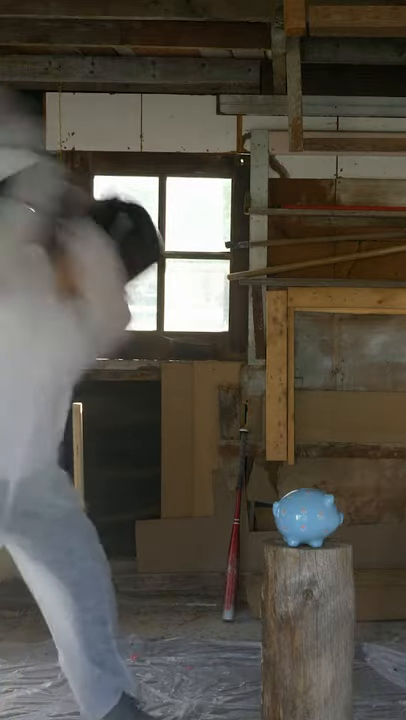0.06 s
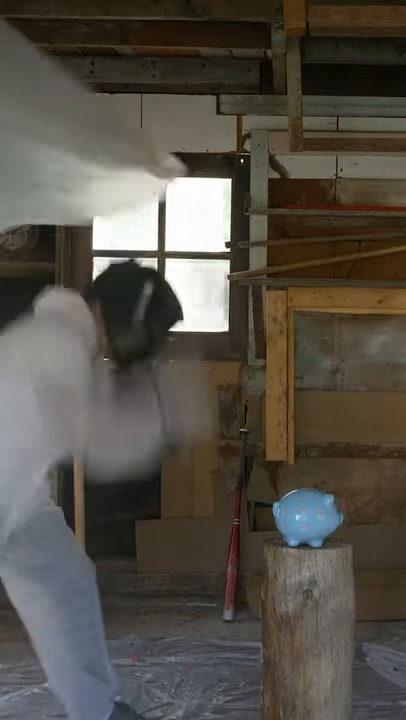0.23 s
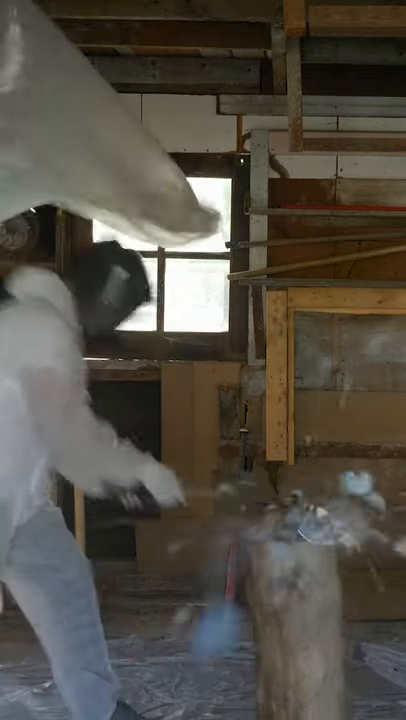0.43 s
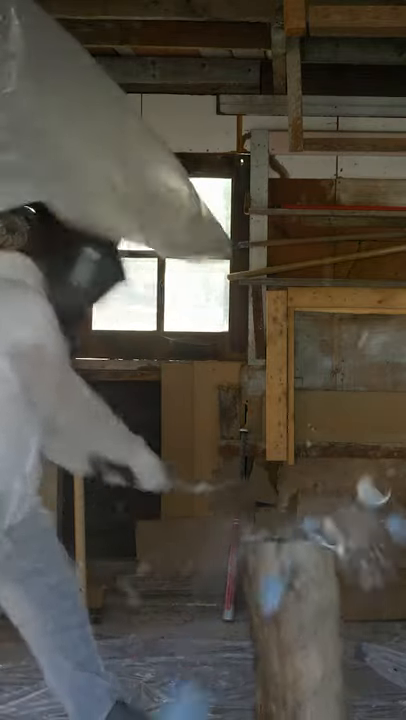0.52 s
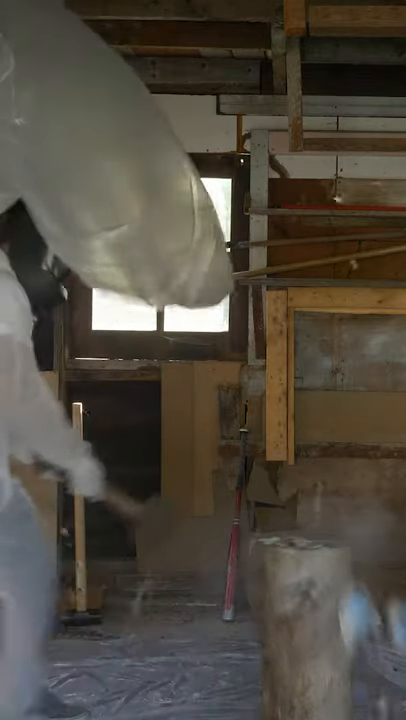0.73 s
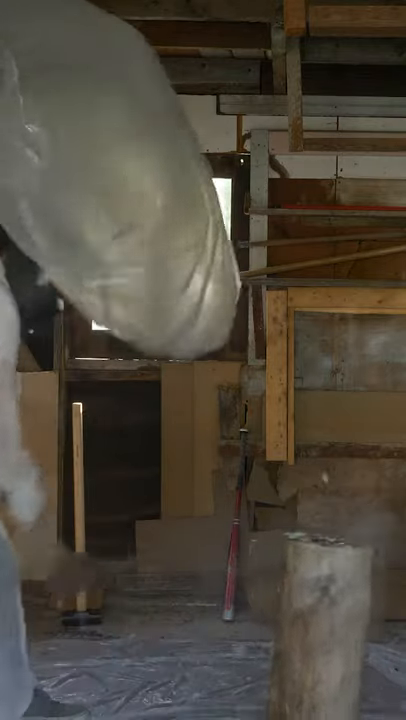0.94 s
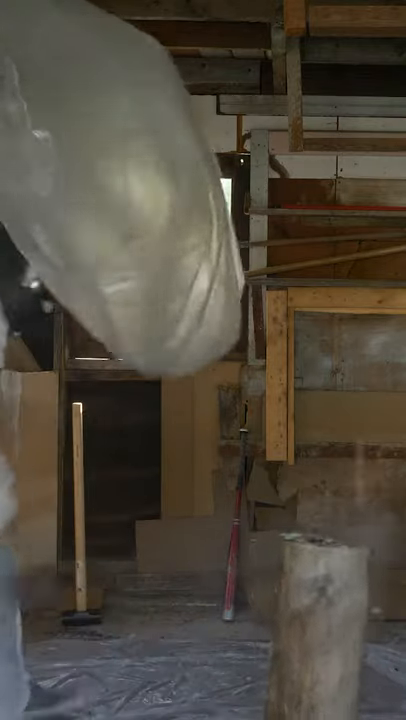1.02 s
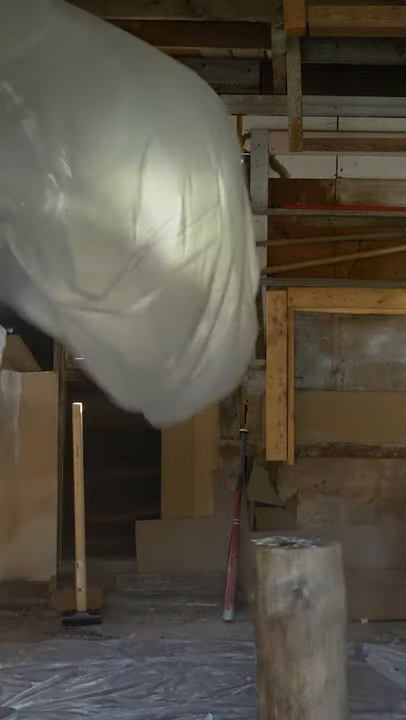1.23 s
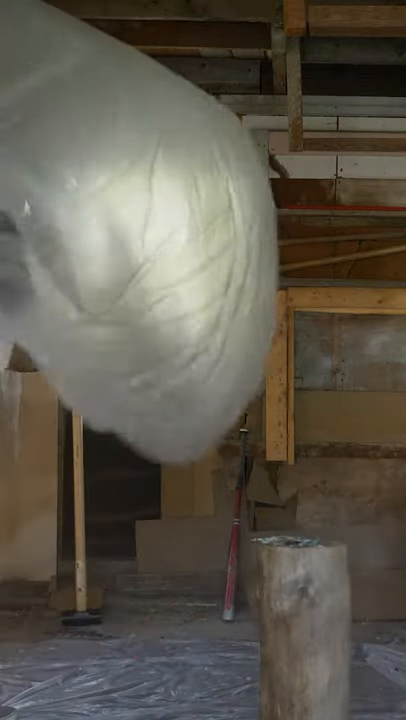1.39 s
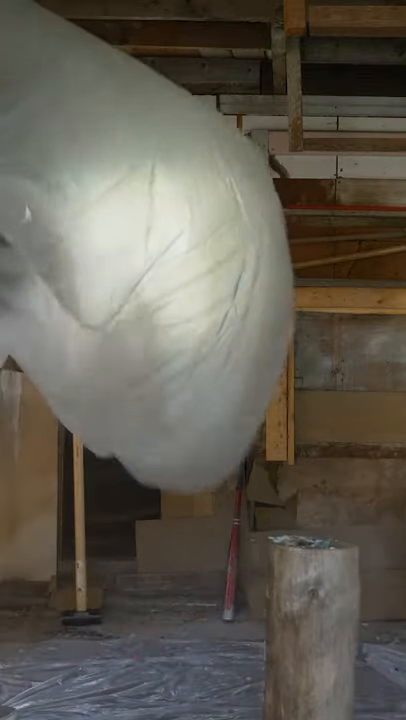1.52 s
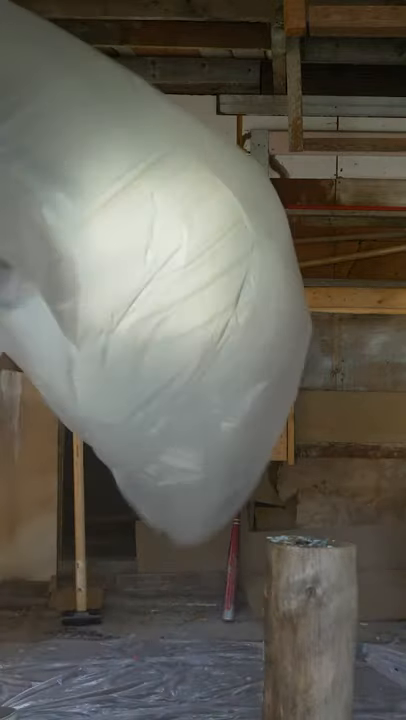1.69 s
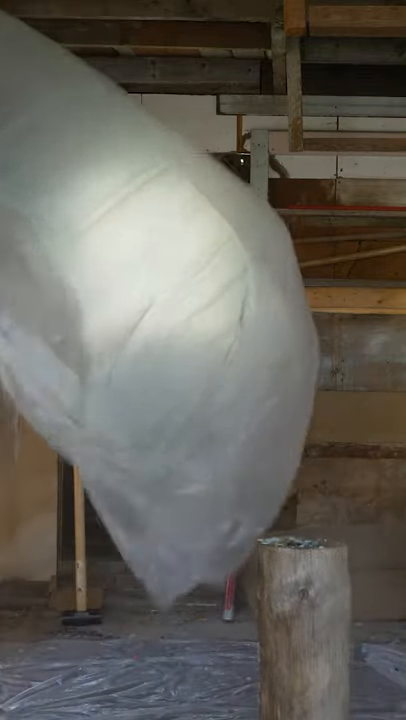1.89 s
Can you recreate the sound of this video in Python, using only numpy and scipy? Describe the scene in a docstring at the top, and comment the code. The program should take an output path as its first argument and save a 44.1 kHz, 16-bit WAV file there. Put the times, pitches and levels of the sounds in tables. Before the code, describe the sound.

Ceramic shatters with a sharp crack after a rustling swing, and pieces clatter and tinkle.

```python
"""A ceramic piggy bank is smashed on a log by a hammer, after the rustle of the swing.
Contacts crack as noise bursts, heavy pieces thud, shards bounce and ring in their own modes.
Debris slides with a hiss and a tinkle of chips; coins jingle across the floor.
The wooden workshop adds a short reverb to the hits; the recorder clips on the peaks."""
import sys
import numpy as np
from scipy import signal
from scipy.fft import rfft, irfft
from scipy.io import wavfile
from scipy.ndimage import uniform_filter1d

SR = 44100
rng = np.random.default_rng(int(sys.argv[2]) if len(sys.argv) > 2 else 0)


def store_wav(level_fs):
    """Save 16-bit WAV to argv[1]."""
    pcm = np.round(np.clip(np.atleast_2d(level_fs), -1, 1) * 32767)
    wavfile.write(sys.argv[1], SR, pcm.T.astype(np.int16))


N = 85995

# noise spectra: f/Hz, relative level/dB
ROOM_SPECTRUM = [(40, 0.5), (120, -13), (1000, -17.5), (15000, -38)]
RUSTLE_SPECTRUM = [(40, -32), (275, -5.5), (629, -6), (2430, -9), (3810, -4), (5550, -16), (14000, -23.5),
                   (15900, -31)]
DEBRIS_SPECTRUM = [(40, -17.5), (381, 2.5), (987, 0), (2690, -3), (3450, 1.5), (6450, -20), (12400, -20.5),
                   (15900, -27)]
# envelopes: t/s, level/dB
RUSTLE_ENVELOPE = [(0, -31.5), (.11, -28.5), (.125, -20.5), (.175, -23.5), (.19, -15), (.225, -17.5),
                   (.243, -14.5), (.3, -22.5), (.35, -29)]
DEBRIS_ENVELOPE = [(.39, -37.5), (.53, -32), (.62, -28.5), (.76, -22.5), (1.03, -22), (1.22, -27),
                   (1.33, -34), (1.42, -34), (1.52, -34), (1.65, -28.5), (1.75, -35.5), (1.95, -46)]
COIN_ENVELOPE = [(.5, -47), (.85, -35.5), (1.33, -37.5), (1.5, -46)]
# hard contacts: t/s, level/dB re CRACK_DB, colour/octaves re 1 kHz, t60/s
CONTACTS = [(0.3576, 21.5, 0.84, 0.018), (0.367, 5, 1, 0.041), (.3725, 8, 2.83, 0.012),
            (.560, -5, 2.25, 0.16), (.632, 6, 0.5, 0.19), (0.653, 3.5, -0.7, 0.084),
            (.7114, 23.5, -0.17, 0.0066), (0.713, 6, 3.5, 0.013), (0.726, 24.5, -0.04, 0.01),
            (0.7301, 11, 1, 0.009), (0.912, 10, 3.5, 0.02), (0.924, 13, 2.5, 0.027), (0.958, 4, 2.5, 0.11),
            (0.974, 10.5, 3, 0.064), (0.999, 2.5, 3, 0.038), (1.019, 9, 0.4, 0.034), (1.1134, 5, 1.5, 0.12),
            (1.124, 4, 2.5, 0.093), (1.158, 9.5, 1.6, 0.066), (1.179, 6.5, 2.5, 0.089),
            (1.278, 4, 0.84, 0.028), (1.284, -0.5, 0.8, 0.05), (1.342, -10, 2.3, 0.012),
            (1.397, 0.5, 0.5, 0.022), (1.405, -4, 0.7, 0.015), (1.429, 1, 3.5, 0.079),
            (1.536, -4.5, 2.5, 0.067), (1.578, -2.5, 1, 0.14), (1.614, -4.5, -0.5, 0.19),
            (1.641, -3.5, 0.9, 0.033)]
# heavy pieces on log and floor: t/s, level/dB, f/Hz, length/s, initial pitch excess/fraction
HEAVY_HITS = [(0.3582, -2, 490, 0.005, 0.2), (0.3752, 1, 150, 0.007, 3.6), (0.6663, 1, 378, 0.0053, 0.23),
              (.757, -14, 492, 0.021, 0.075), (.992, -14, 496, 0.0098, 0.037),
              (1.3027, -4, 380, 0.005, 0.2)]
# shard modes: f/Hz
BIG_MODES_HZ = [1005, 1828, 2340, 3152, 3885, 4530, 5090, 6088, 6896, 7795, 9300, 9873, 10640]
MIDDLE_MODES_HZ = [1910, 2895, 3545, 3915, 5500]
SMALL_MODES_HZ = [3630, 4125, 5875, 7224, 8371]
# mode strengths: relative level/dB
BIG_MODES_DB = [-3, -2, -8, -4, -1, -2, -5, -8, -7, -9, -10, -12, -12]
MIDDLE_MODES_DB = [-4, -6, 2.5, -7, 1]
SMALL_MODES_DB = [0, -3, -5, -2, -6]
# shard bounces: t/s, level/dB, strike centre f/Hz, free ringing/s
BIG_BOUNCES = [(0.385, -21.5, 3680, 0.17), (0.458, -28.5, 2170, 0.13), (0.471, -24, 5500, 0.12),
               (0.558, -17, 3430, 0.11), (0.631, -18, 6700, 0.0098), (0.641, -12.5, 3520, 0.016),
               (.714, -14, 4500, 0.22), (0.729, -5, 3770, 0.0032), (0.959, -7.5, 2940, 0.036),
               (0.971, -12.5, 4920, 0.043), (0.96, -17.5, 1790, 0.077), (1.035, -23.5, 950, 0.23),
               (1.053, -25.5, 4640, 0.12), (1.114, -10, 2560, 0.022), (1.177, -9.5, 4100, 0.064),
               (1.432, -13, 5250, 0.015), (1.432, -19, 3630, 0.054), (1.537, -20.5, 1050, 0.065),
               (1.537, -14, 2560, 0.021), (1.555, -17.5, 1930, 0.12), (1.648, -20.5, 1960, 0.084),
               (1.578, -21, 6000, 0.069), (1.662, -27.5, 960, 0.2), (1.68, -30.5, 7240, 0.16)]
MIDDLE_BOUNCES = [(.47, -26, 3830, 0.1), (0.56, -18, 4400, 0.12), (.712, -7.5, 2790, 0.014),
                  (.76, -21.5, 1900, .14), (.88, -28, 3180, 0.043), (1.029, -20, 1910, .08),
                  (1.478, -25, 3600, 0.18), (1.68, -32.5, 5500, 0.077)]
SMALL_BOUNCES = [(.911, -25, 5900, .06), (.924, -6.5, 3700, 0.03), (0.926, -14, 7900, 0.017),
                 (1.276, -28, 7200, .02)]
# workshop decay: f/Hz, t60/s
WORKSHOP_DECAY = [(200, 0.36), (1000, 0.08), (4000, 0.22), (12000, 0.1)]

BLOW_S = CONTACTS[0][0]
ROOM_DB, CRACK_DB, CHIP_DB, REVERB_DB = -44, -18.5, -5, -12.5
BIG_T60_S, MIDDLE_T60_S, SMALL_T60_S = .71, .97, .34  # at 1 kHz
TIME_S = np.arange(N) / SR


def amp(db):
    return 10 ** (np.asarray(db) / 20)


def unit_rms(x):
    return x / np.sqrt(np.mean(x ** 2) + 1e-20)


def at_hz(table, hz):
    f, value = np.transpose(table)
    return np.interp(np.log(hz + 1), np.log(f + 1), value)


def add(mix, start_s, sound):
    part = mix[round(start_s * SR):][:len(sound)]
    part += sound[:len(part)]


def envelope(table):
    return amp(np.interp(TIME_S, *np.transpose(table)))


def hiss(spectrum, patch_db, flicker_db):
    """Coloured noise with drifting patches and a flicker common to all bands."""
    frames, hz = N // 128 + 5, np.fft.rfftfreq(512, 1 / SR)
    real, imag, patches = rng.standard_normal((frames, 257, 3)).T
    patches = unit_rms(uniform_filter1d(uniform_filter1d(patches, 5, axis=0), 12, axis=1))
    db = at_hz(spectrum, hz)[:, None] + patch_db * patches + flicker_db * rng.standard_normal(frames)
    return unit_rms(signal.istft((real + 1j * imag) * amp(db), nperseg=512, noverlap=384)[1][:N])


def tinkle(per_s, low_hz, high_hz, t60_s=.1, spread_db=3):
    """Small pieces touch at random: 24 shapes, three modes each."""
    strikes = amp(spread_db * np.minimum(rng.exponential(1, N), 4)) * (rng.random(N) < per_s / SR)
    shape, t, out = rng.integers(0, 24, N), np.arange(4096) / SR, np.zeros(N)
    for k, hz in enumerate(low_hz * (high_hz / low_hz) ** rng.random((24, 3, 1))):
        ring = (np.sin(2 * np.pi * hz * t) / hz).sum(0) * amp(-60 * t / t60_s)
        out += signal.oaconvolve(strikes * (shape == k), ring)[:N]
    return unit_rms(out)


def room_tone():
    """Faint, bass-heavy background noise."""
    return amp(ROOM_DB) * hiss(ROOM_SPECTRUM, patch_db=1.5, flicker_db=.8)


def swing_rustle(fade_db_per_s=150):
    """The swing rustles, then fades fast after the blow."""
    fade = amp(-fade_db_per_s * np.maximum(TIME_S - BLOW_S, 0))
    return envelope(RUSTLE_ENVELOPE) * hiss(RUSTLE_SPECTRUM, patch_db=-1, flicker_db=1.5) * fade


def crack(db, colour_oct, t60_s, width_oct=.8, lump_db=3.2, snap_s=.0008, ping_t60_s=.06):
    """Hard contact: a wideband snap, a burst of splintering noise, four splinters pinging on."""
    def colour(hz):
        return 1 / (1 + ((np.log2(hz / 1e3) - colour_oct) / width_oct) ** 2)

    n = 8192
    t, f = np.arange(n) / SR, np.fft.rfftfreq(n, 1 / SR) + 1
    lumps = amp(lump_db * unit_rms(uniform_filter1d(rng.standard_normal(len(f)), 70)))
    burst = unit_rms(irfft(rfft(rng.standard_normal(n)) * lumps * colour(f))) * amp(-60 * t / t60_s)
    ping_hz = 5000 * (14500 / 5000) ** rng.random((4, 1))
    pings = (colour(ping_hz) * np.sin(2 * np.pi * ping_hz * t)).sum(0) * amp(-2 - 60 * t / ping_t60_s)
    snap = amp(-11) * rng.standard_normal(n) * np.exp(-t / snap_s)
    return amp(db + CRACK_DB) * (burst + snap + pings)


def debris():
    """From the blow on, debris slides and chips collide."""
    chips = amp(CHIP_DB) * tinkle(per_s=300, low_hz=3000, high_hz=12000)
    slide = hiss(DEBRIS_SPECTRUM, patch_db=1.5, flicker_db=1.5)
    return (TIME_S > BLOW_S) * envelope(DEBRIS_ENVELOPE) * (slide + chips)


def thud(db, hz, length_s, excess, drop_s=.003, boom_hz=(225, 900), boom_t60_s=.2, rise_s=.013):
    """Heavy piece: a short knock of falling pitch, then the low boom of boards."""
    t = np.arange(16384) / SR
    pitch_hz = hz * (1 + excess * np.exp(-t / drop_s))
    knock = np.sin(2 * np.pi * np.cumsum(pitch_hz) / SR) * np.exp(-(t / length_s) ** 2)
    boards = signal.lfilter(*signal.butter(1, boom_hz, "band", fs=SR), rng.standard_normal(len(t)))
    boom = unit_rms(boards) * amp(-12 - 60 * t / boom_t60_s) * np.minimum(t / rise_s, 1)
    return amp(db) * (knock + boom)


def shard_ring(modes_hz, modes_db, t60_s, db, centre_hz, free_s, width_oct=.4, tumble_hz=30):
    """Modes near the strike centre ring, waver as the shard tumbles, die fast once it settles."""
    rise_s, settle_s, loss_power = .0015, .007, .7
    hz, t = np.array(modes_hz)[:, None], np.arange(round((free_s + .1) * SR)) / SR
    excitation = 1 / (1 + (np.log2(hz / centre_hz) / width_oct) ** 2) ** 2
    spin, phase = rng.random((len(hz), 2)).T[:, :, None]
    waver = 1 + .42 * np.sin(2 * np.pi * (tumble_hz * (.5 + spin) * t + phase))
    decay = amp(np.array(modes_db)[:, None] - 60 * t / t60_s * (hz / 1e3) ** loss_power)
    tones = excitation * waver * decay * np.sin(2 * np.pi * hz * t)
    gate = np.minimum(t / rise_s, 1) * np.exp(-np.maximum(t - free_s, 0) / settle_s)
    return amp(db) * tones.sum(0) * gate


def coins():
    """Coins jingle across the floor in a narrow treble band."""
    moving = (TIME_S > COIN_ENVELOPE[0][0]) * (TIME_S < COIN_ENVELOPE[-1][0])
    return moving * envelope(COIN_ENVELOPE) * tinkle(per_s=140, low_hz=12100, high_hz=13300)


def workshop_reverb(x):
    """Sparse reflections of random sign; each band decays at its own rate."""
    taps, slots = np.zeros(SR // 2), np.arange(200, SR // 2 - 20, 20)
    taps[slots + rng.integers(0, 20, len(slots))] = rng.choice([-1., 1.], len(slots))
    hz, t, bands = signal.stft(taps, SR, nperseg=256)
    decay = amp(-60 * t / at_hz(WORKSHOP_DECAY, hz)[:, None])
    tail = signal.istft(bands * decay, SR, nperseg=256)[1]
    return amp(REVERB_DB) * signal.fftconvolve(x, tail / np.linalg.norm(tail))[:N]


def scene():
    """Mono mix: dry bed, hits with reverb."""
    bed = swing_rustle() + debris() + coins() + room_tone()
    hits = np.zeros(N)
    for source, table in (crack, CONTACTS), (thud, HEAVY_HITS):
        for start_s, *hit in table:
            add(hits, start_s, source(*hit))
    for *shard, bounces in ((BIG_MODES_HZ, BIG_MODES_DB, BIG_T60_S, BIG_BOUNCES),
                            (MIDDLE_MODES_HZ, MIDDLE_MODES_DB, MIDDLE_T60_S, MIDDLE_BOUNCES),
                            (SMALL_MODES_HZ, SMALL_MODES_DB, SMALL_T60_S, SMALL_BOUNCES)):
        for start_s, *bounce in bounces:
            add(hits, start_s, shard_ring(*shard, *bounce))
    return (bed + hits + workshop_reverb(hits))[None]


def record(dry):
    """Microphone bass cut, peak clipping, band limit."""
    low_cut_hz, ceiling, high_cut_hz = 99, .96, 16000
    mic = signal.lfilter(*signal.butter(3, low_cut_hz, "high", fs=SR), dry)
    lowpass = signal.firwin(511, high_cut_hz, window=("kaiser", 9), fs=SR)
    return signal.oaconvolve(np.clip(mic, -ceiling, ceiling), lowpass[None], "same")


dry = scene()
out = record(dry)
store_wav(out)
```